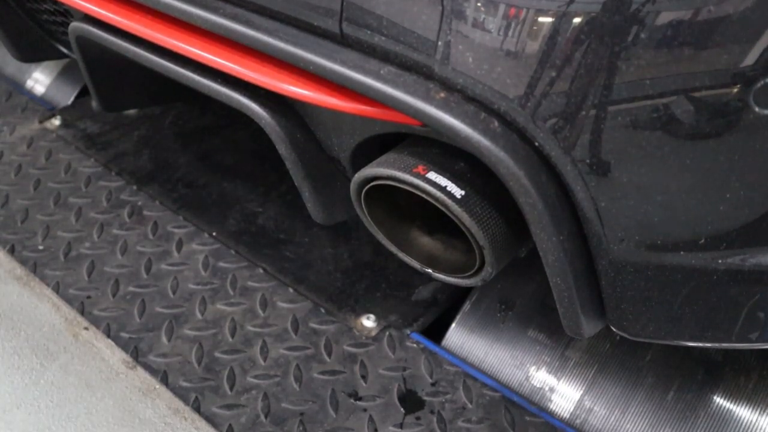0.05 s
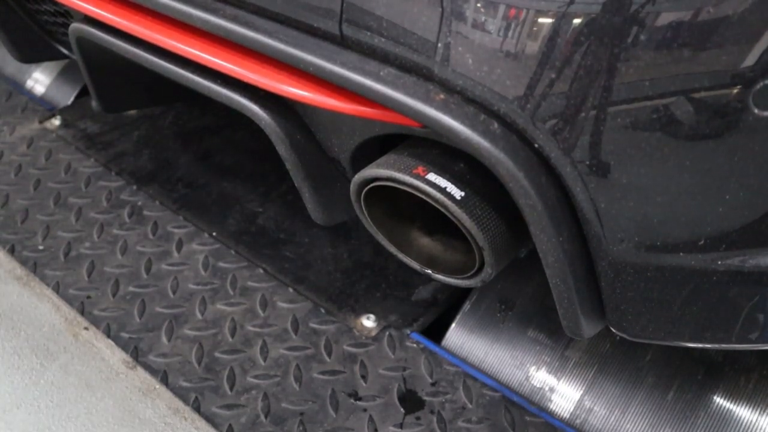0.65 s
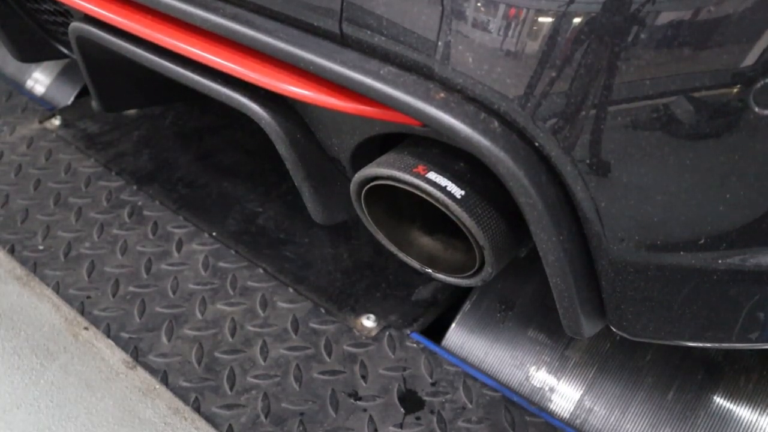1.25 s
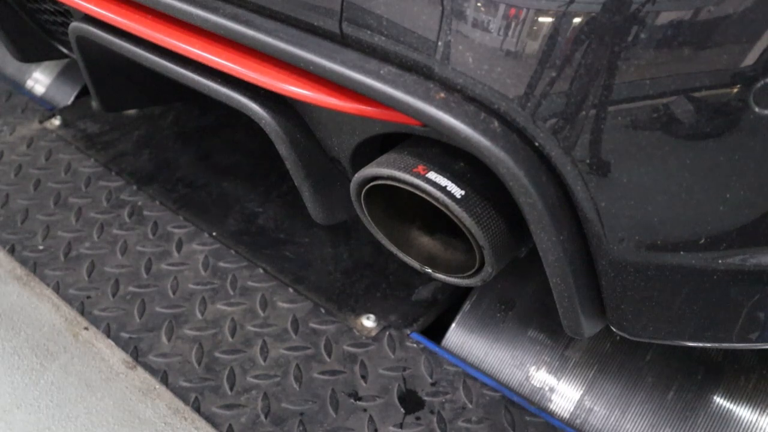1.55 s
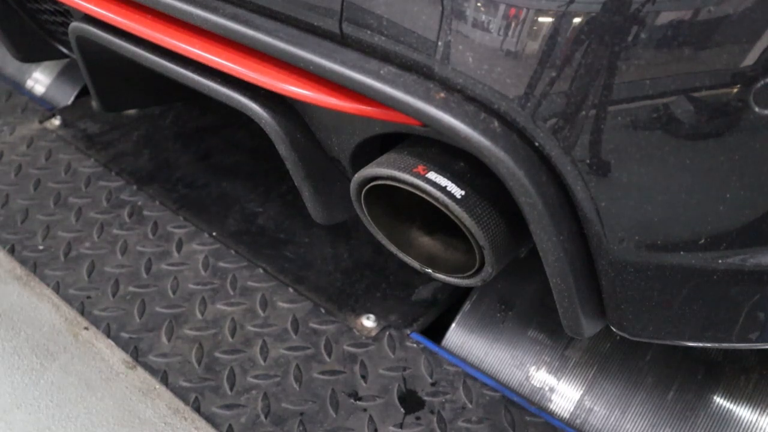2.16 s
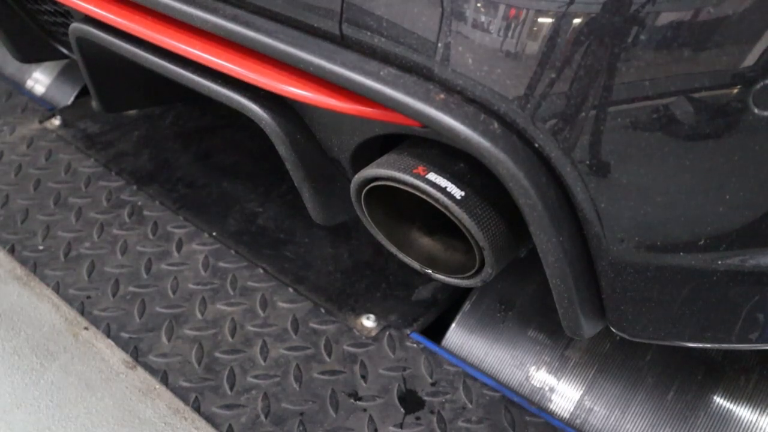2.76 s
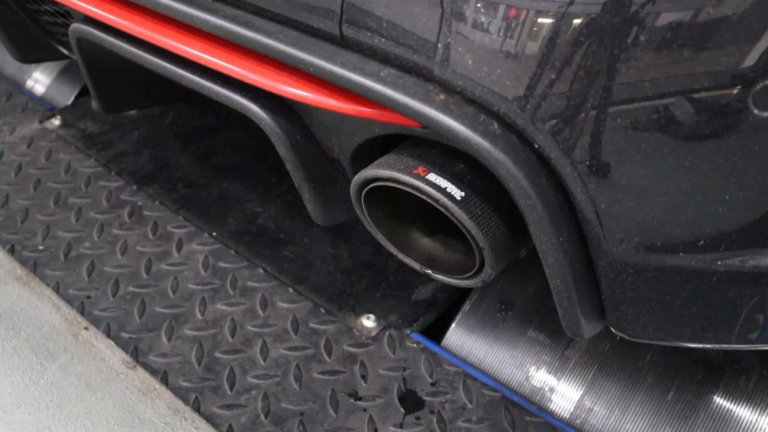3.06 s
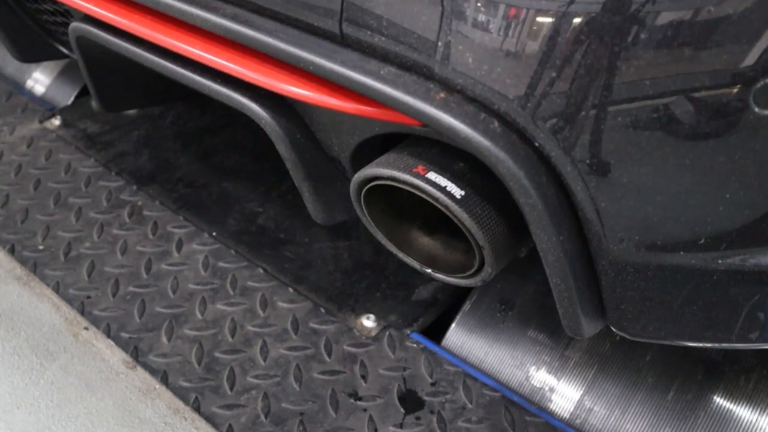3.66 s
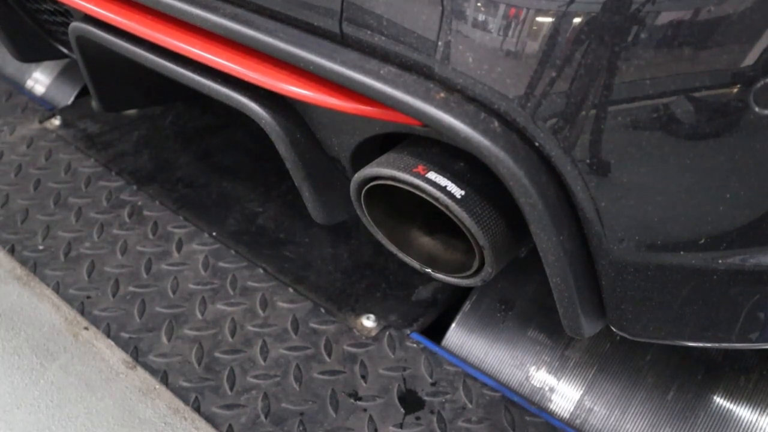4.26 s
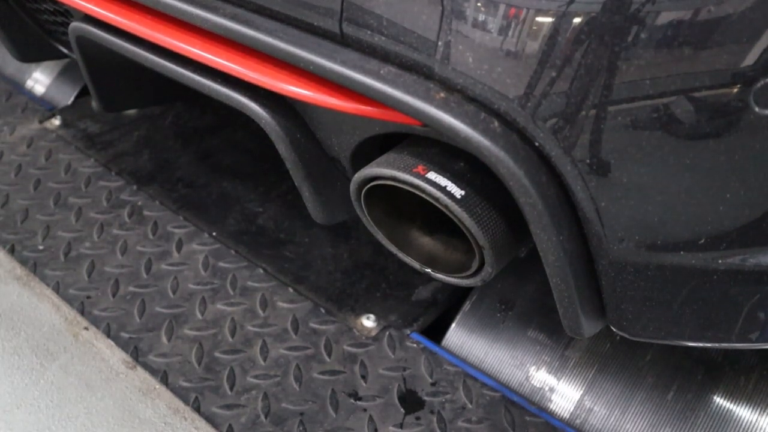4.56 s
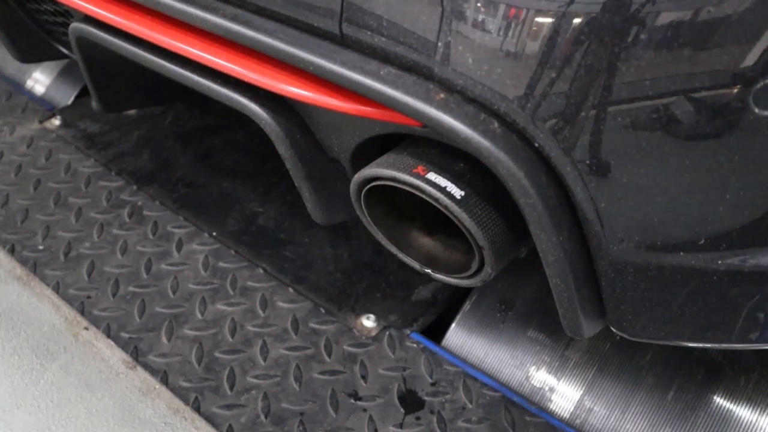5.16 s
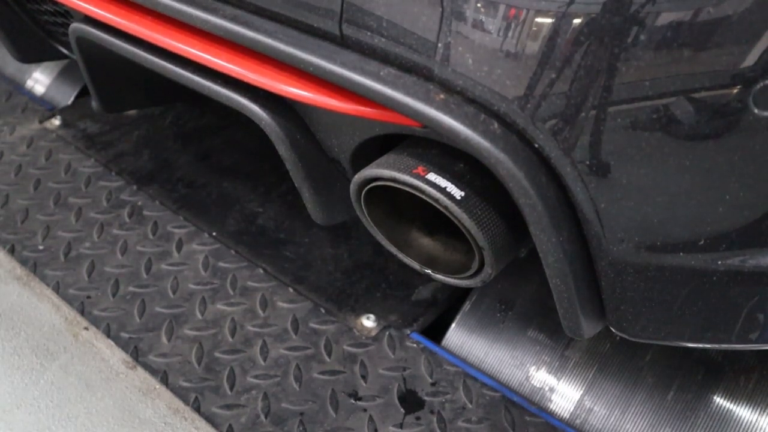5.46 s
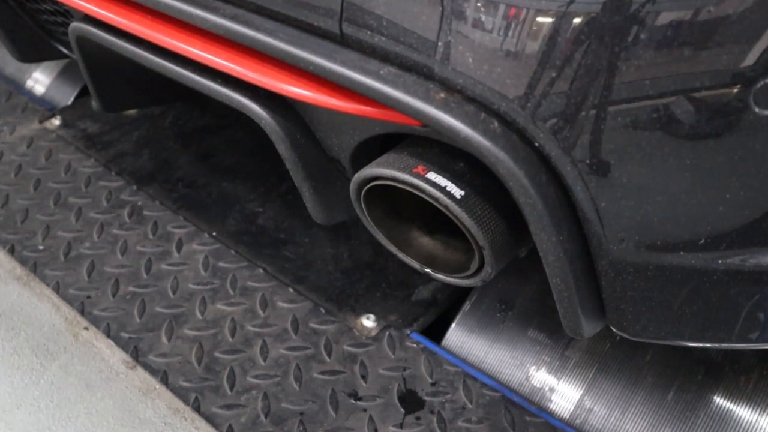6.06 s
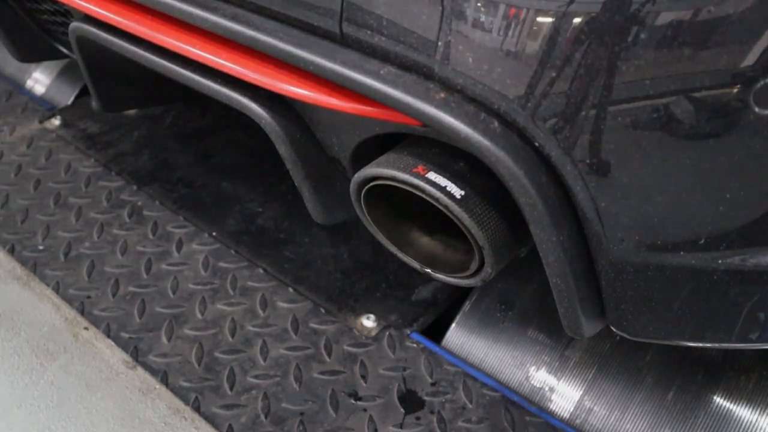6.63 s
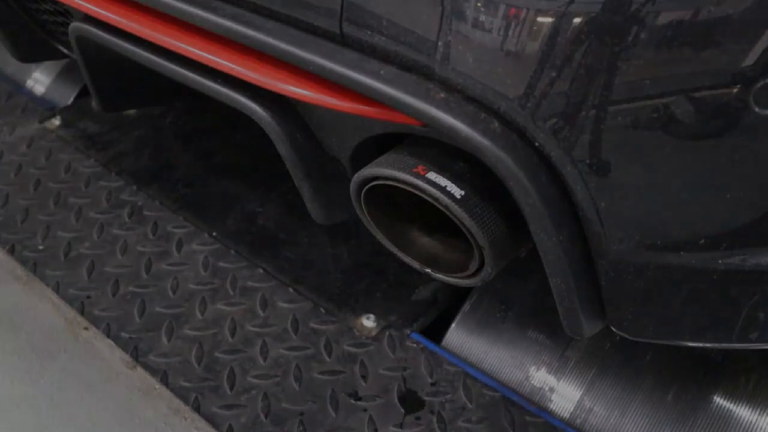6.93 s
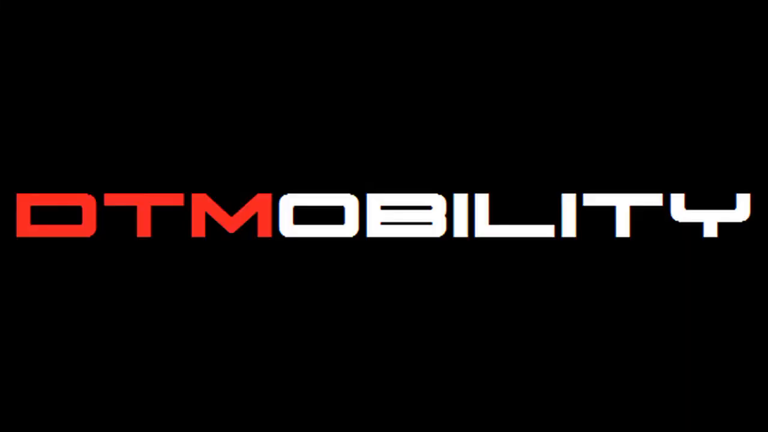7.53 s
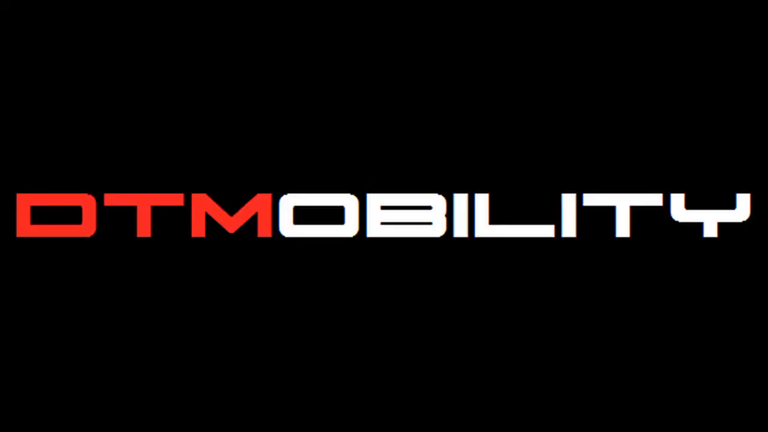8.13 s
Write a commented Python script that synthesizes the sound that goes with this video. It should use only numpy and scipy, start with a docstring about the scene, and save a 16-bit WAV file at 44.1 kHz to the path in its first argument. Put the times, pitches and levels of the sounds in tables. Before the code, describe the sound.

Three raspy revs from a car's tailpipe over a low drone, each falling away with crackling pops in a hard-walled bay.

```python
"""A four-cylinder car drones, rasps and pops through three revs, beside its sports tailpipe in a test bay.
On throttle each firing kicks the pipe's modes, blows a turbulent puff and sets the tip snarling.
On lift-off fuel burns in the pipe, which burbles, pops and once bangs. The gas jet hisses; hard walls
answer. At the end the afterfire stops and the engine sinks smoothly towards idle."""
import sys
import numpy as np
from scipy import signal
from scipy.fft import rfft, irfft, next_fast_len
from scipy.io import wavfile
from scipy.ndimage import uniform_filter1d

SR = 44100
rng = np.random.default_rng(int(sys.argv[2]) if len(sys.argv) > 2 else 0)


def transcribe(signal):
    """Save signal, clipped to [-1, 1], as a 16-bit WAV file at the path in sys.argv[1]."""
    frames = np.atleast_2d(signal).T
    limited = np.clip(frames, -1, 1)
    pcm = np.round(limited * 32767).astype(np.int16)
    wavfile.write(sys.argv[1], SR, pcm)


N = 369999
TIME = np.arange(N) / SR
REF_HZ = 100  # reference firing rate
FIRST_LOAD = 0.45  # share of load that comes with the pedal; the rest builds late
EVEN_SCATTER_DB = 4.5  # between firings, without afterfire

# long modes of pipe and silencer: f/Hz, width/Hz, level/dB
LONG_MODES = [(54.4, 4.3, 2.5), (129.3, 5.6, 0), (173, 16.6, 4.5), (204.7, 10.6, 4.5), (262.1, 10.3, -4.5),
              (370.8, 14.8, -5.5), (452, 54, -5.5), (510.4, 28, -8)]
# bright modes of the tip: f/Hz, width/Hz, level/dB
TIP_MODES = [(433, 110, 0.5), (820, 210, 9.5), (1000, 36, 3.5), (1191, 73, -1.5), (1402, 38, 3),
             (1702, 56, 8), (1830, 55, 3.5), (2392, 43, -5), (2756, 70, -2), (2950, 72, -5),
             (3440, 110, -6), (3880, 93, -10), (5710, 600, -10.5)]
# spectrum of turbulent puffs: f/Hz, level/dB
PUFF_SPECTRUM = [(330, -5), (470, 5), (600, -27.5), (850, 6), (1200, 5), (1560, -2.5), (1780, 3.5),
                 (1950, 0), (2300, -7), (2900, -8.5), (3900, -18), (5900, -23), (8000, -26.5),
                 (13000, -37.5)]


def engine(start_hz=45.69, final_hz=53.9, spin_power=1.2, boost_power=2.75):
    """Firing rate and load: the pedal spins the engine up, the speed hangs, then friction slows it."""
    # throttle blips: t/s, spin-up/s, held/s, pedal travel/s, release/s, hang/s, start f/Hz, top f/Hz
    revs = [(.3, .465, .56, .13, .05, .1, 52, 151), (2.605, .713, .713, .03, .016, .08, 44, 204),
            (5.12, .46, .47, .22, .06, .26, 89, 176)]
    # pedal depth per blip: load factor
    depths = [0.87, 1.31, 0.96]
    points, load = [(0, start_hz)], np.zeros(N)
    ramp = np.linspace(0, 1, 20)
    ends = [(rev[0], rev[-2]) for rev in revs[1:]] + [(TIME[-1], final_hz)]
    for rev, (end_s, end_hz), depth in zip(revs, ends, depths):
        s, climb_s, held_s, travel_s, release_s, hang_s, low_hz, top_hz = rev
        points += zip(s + climb_s * ramp, low_hz + (top_hz - low_hz) * ramp ** spin_power)
        coast_s = s + held_s + hang_s
        points += [(coast_s, top_hz), (end_s, end_hz)]
        age_s = TIME - s
        pedal = np.clip(age_s / travel_s, 0, 1) * np.exp(-np.maximum(age_s - held_s, 0) / release_s)
        boost = np.clip(age_s / climb_s, 0, 1) ** boost_power
        load += depth * pedal * (FIRST_LOAD + (1 - FIRST_LOAD) * boost)
    return np.interp(TIME, *np.transpose(points)), load


def drone(state, phase, scatter_db, bloom_hz=240, whump_hz=170, whump_octaves=0.51):
    """Smooth part of the firing pulses; orders bloom and whump while among the pipe's long modes."""
    # drone law: base/dB, speed/dB per octave, load/dB, afterfire/dB
    law = (0, -1.5, 5.5, -6)
    # response of the pipe's standing waves: f/Hz, level/dB
    pipe = [(45, -42), (54, -17.5), (62, -28), (80, -29.5), (90, -32.5), (101, -42.5), (115, -25),
            (128, -22), (140, -29.5), (153, -23.5), (176, -27), (195, -26), (212, -23), (240, -29.5),
            (268, -26.5), (300, -27), (360, -29.5)]
    hz, _, burn = state
    lumps_db = 7 * burn * np.minimum(hz / REF_HZ, 1) ** 2 * drift(17)  # afterfire breaks up the note
    drive_db = level_db(law, state) + lumps_db
    # uneven burning shakes timing and strength
    angle = 2 * np.pi * (phase + 0.039 * (scatter_db - EVEN_SCATTER_DB / 2) * drift(45))
    out, swells = 0, whumps()
    for k, order_db in enumerate([0, -2, -12, -16, -20], 1):
        bloom = 1 if k == 1 else 0.76 + 0.69 / (1 + (k * hz / bloom_hz) ** 8)
        pipe_db = curve_db(pipe, min(k, 2) * hz)
        tone = bloom * undb(drive_db + pipe_db + order_db + 0.88 * scatter_db * drift(35))
        whump = swells * np.exp(-(np.log2(k * hz / whump_hz) / whump_octaves) ** 2)
        out += np.hypot(tone, whump) * np.sin(k * angle)
    return np.sqrt(2) * out


def whumps():
    """Envelope of the swells that hard firings add to the low note."""
    # runs of hard firings: t/s, length/s, level/dB
    runs = [(0.46, 0.12, -18), (0.792, 0.15, -9), (1.089, 0.081, -10.5), (1.274, 0.11, -15),
            (1.43, 0.054, -22), (2.16, 0.1, -22.5), (2.752, 0.32, -14.5), (3.128, 0.044, -13),
            (3.334, 0.047, -8.5), (3.455, 0.024, -4.5), (3.485, .048, -10), (3.54, 0.041, -14),
            (3.617, 0.12, -11.5), (3.848, 0.042, -17.5), (3.92, 0.078, -15), (4.127, 0.04, -22),
            (4.36, 0.29, -16), (4.746, 0.08, -26), (4.89, 0.05, -31), (5.699, 0.076, -9.5),
            (6.228, 0.04, -20), (6.543, 0.25, -18.5), (6.725, 0.2, -13.5), (6.995, 0.12, -21.5),
            (7.18, 0.11, -14), (7.366, 0.046, -18), (7.49, 0.036, -19)]
    out = np.zeros(N)
    for s, length_s, db in runs:
        add(out, s, undb(db) * np.hanning(int(length_s * SR)) ** 0.5)
    return out


def firings(state, phase, scatter_db, jitter_s_per_db=0.000201, sputter_db=2.5, gas_share=0.065):
    """Each firing kicks the pipe and blows a puff of gas; afterfire makes them sputter in clumps."""
    # cylinders in firing order: level/dB
    cylinder_db = [0, -2.5, -0.4, -0.14]
    # bark and rasp laws: base/dB, speed/dB per octave, load/dB, afterfire/dB
    bark_law = (-35, 6.5, 11.5, 5.5)
    rasp_law = (-38, 7, 15, 0.5)
    _, _, burn = state
    even_s = np.interp(np.arange(int(phase[-1]) + 1), phase, TIME)
    size_draw, time_draw = rng.standard_normal((len(even_s), 2)).T
    spread_db = np.interp(even_s, TIME, scatter_db)
    cylinders = undb(np.resize(cylinder_db, len(even_s)))
    sizes = cylinders * undb(spread_db * np.tanh(size_draw))
    uneven_s = even_s + jitter_s_per_db * (spread_db - 0.75 * EVEN_SCATTER_DB) * time_draw
    clumps_db = sputter_db * burn * drift(28)
    lumps = pulses(uneven_s, sizes - uniform_filter1d(sizes, size=9))  # departure from an even train
    strengths = sizes ** 0.48
    puffs = strengths[phase.astype(int)] * np.exp(-(phase % 1)) * rng.standard_normal(N)
    kicks = pulses(uneven_s, strengths) + gas_share * puffs
    bark = undb(level_db(bark_law, state) + clumps_db) * steady(ring(kicks, tailpipe(rise_s=0.0013)))
    rasp = undb(level_db(rasp_law, state) + clumps_db / 2) * steady(ring(puffs, colour(PUFF_SPECTRUM)))
    out = undb(clumps_db) * burble(lumps, state) + bark + rasp
    return out + snarl(pulses(even_s, cylinders), puffs, state)


def tailpipe(rise_s, low_hz=620):
    """Impulse response of the tailpipe, hollow below its first mode."""
    # short modes of the tailpipe: f/Hz, width/Hz, level/dB
    short_modes = [(664, 14, -3), (702, 22, 7), (745, 42, 4), (805, 42, 2), (872, 30, 0), (1060, 200, -12),
                   (1150, 26, -11), (1223, 20, -12), (1290, 19, -6)]
    return signal.sosfilt(highpass(4, low_hz), modes(short_modes, top_hz=1420, rise_s=rise_s))


def snarl(train, puffs, state, roughness=0.33):
    """Even firings steepen into shocks that ring the tip on throttle; speed and afterfire roughen them."""
    # snarl law: base/dB, speed/dB per octave, load/dB, afterfire/dB
    law = (-37, 6.5, 11, -8.5)
    hz, load, burn = state
    fronts = steady(train) + (roughness * hz / REF_HZ + burn) * steady(puffs)
    throttle = np.clip(0.078 + load / FIRST_LOAD, 0, 1)
    # hot gas raises all modes: ring them on a faster clock
    clock = np.cumsum(1 + 0.029 * np.log2(hz / REF_HZ) + 0.03 * load)
    ticks = np.arange(int(clock[-1]) + 1)
    tip = ring(np.interp(ticks, clock, fronts), modes(TIP_MODES, top_hz=6800, rise_s=0.0026))
    return undb(level_db(law, state)) * throttle * steady(np.interp(clock, ticks, tip))


def afterfire(fade_s=0.19):
    """Strength of fuel burning in the pipe: 0 for none, about 1 in a spell."""
    # spells of burning: t/s, length/s, strength
    spells = [(-.1, .48, .9), (.97, 1.58, .95), (3.36, 1.7, 1.0), (5.7, .22, .9), (6.14, 1.42, 1.05)]
    burn = sum(strength * ((TIME >= s) & (TIME < s + length_s)) for s, length_s, strength in spells)
    return uniform_filter1d(burn, int(fade_s * SR))


def burble(lumps, state, deep_db=5):
    """Uneven firings ring the long modes; the deepest answers only to afterfire, best at low speed."""
    # burble law: base/dB, speed/dB per octave, load/dB, afterfire/dB
    law = (-33, -1, 10.5, 8)
    hz, _, burn = state
    deep = ring(lumps * burn, modes(LONG_MODES[:1], top_hz=300, rise_s=0.04))
    deep *= undb(deep_db) * np.minimum(REF_HZ / hz, 1) ** 3
    upper = ring(lumps, modes(LONG_MODES[1:], top_hz=587, rise_s=0.0075))
    return undb(level_db(law, state)) * steady(deep + upper)


def pops():
    """Fuel pockets ignite in the pipe: a thump, a short bark and a crack that rings the tip."""
    # ignitions: t/s, relative body level/dB, relative crack level/dB
    ignitions = [(0.208, -15.5, -42), (0.952, -11.5, -47), (1.096, -15, -34), (1.151, -11, -28),
                 (1.27, -15, -33.5), (1.363, -23, -38), (1.46, -12, -29.5), (1.56, -27, -56),
                 (1.666, -16.5, -32), (1.856, -24, -76), (1.963, -17, -52), (2.054, -19.5, -59),
                 (2.173, -22.5, -61), (2.403, -26, -63), (3.375, -12, -16.5), (3.412, -18, -35),
                 (3.447, -12, -24.5), (3.563, -11, -22.5), (3.612, -11, -25.5), (3.638, -10, -22.5),
                 (3.649, -12, -22), (3.732, -9.5, -21), (3.824, -25, -47), (3.861, -15.5, -33),
                 (3.941, -20.5, -32), (4.114, -18, -41), (4.15, -17, -37), (4.489, -16.5, -38),
                 (4.607, -20.5, -46), (4.817, -20.5, -38), (5.004, -15, -38), (5.581, -13, -37),
                 (5.733, -10.5, -26), (5.855, -10.5, -27), (5.868, -21, -37), (5.882, -16, -33),
                 (6.174, -19.5, -34.5), (6.28, -24, -36.5), (6.383, -22, -39), (6.474, -19.5, -39),
                 (6.601, -18, -35), (6.666, -26, -36), (6.833, -22, -31.5), (7.008, -17.5, -53),
                 (7.117, -16, -52), (7.173, -18, -62), (7.238, -18.5, -48.5), (7.306, -16, -53),
                 (7.508, -16, -44)]
    thump = modes(LONG_MODES, top_hz=510, rise_s=0.0056)
    bark, crack = tailpipe(rise_s=0.00064), colour(PUFF_SPECTRUM)
    tip = modes(TIP_MODES, top_hz=5500, rise_s=0.0005)
    out = np.zeros(N)
    for s, body_db, crack_db in ignitions:
        add(out, s, undb(body_db - 8) * burst(thump, decay_s=0.021, grit=0.019))
        add(out, s, undb(body_db - 7.5) * burst(bark, decay_s=0.01, grit=0.05))
        add(out, s, undb(crack_db + 2.5) * burst(crack, decay_s=0.01, grit=0.22))
        add(out, s, undb(crack_db - 4) * burst(tip, decay_s=0.019, grit=0.24))
    return out


def bangs(gain_db=-15):
    """Detonations at the pipe mouth: shock fronts with treble right to the top."""
    # detonations: t/s, relative level/dB
    detonations = [(3.382, -15), (5.781, 1.5), (5.788, -6)]
    shock = colour([(300, 11.5), (2000, 5), (3300, -3), (4500, -8), (13000, -8)])
    out = np.zeros(N)
    for s, db in detonations:
        add(out, s, undb(db + gain_db) * burst(shock, decay_s=0.0017, grit=0.58))
    return out


def jet(state):
    """Hiss of the gas stream, with rushes of air that swell and fade around each lift-off."""
    # jet spectrum: f/Hz, level/dB
    spectrum = [(1500, 1.5), (2800, -0.5), (5500, -6.5), (8500, -10.5), (11500, -9.5), (13000, -34.5)]
    # hiss law: base/dB, speed/dB per octave, load/dB, afterfire/dB
    law = (-51.5, 11.5, 0.5, -2.6)
    # air rushes: t/s, relative level/dB, decay/s, centre f/Hz
    rushes = [(0.69, -27, 0.061, 5700), (0.76, -30.5, 0.13, 10800), (5.42, -24, 0.064, 5750),
              (3.018, -21.5, 0.057, 5770), (3.14, -24, 0.096, 10600), (5.478, -27, 0.18, 10800),
              (5.824, -14, 0.018, 6400), (5.828, -17.5, 0.099, 1670)]
    out = undb(level_db(law, state)) * steady(ring(rng.standard_normal(N), colour(spectrum)))
    for s, db, decay_s, hz in rushes:
        band = colour([(hz / 4, -12), (hz, 0), (hz * 1.67, -13), (hz * 4, -30)])
        air = ring(rng.standard_normal(SR), band)
        fade = np.exp(-TIME[:SR] / decay_s)
        add(out, s, undb(db) * air / air.std() * fade * (1 - fade) ** 2)
    return out


def bay(x, wet_db, near_db, t60_s=0.7, near_t60_s=0.065, quadrature_hz=3840, size=22000):
    """Stereo: treble drifts out of phase, floor and bumper widen the sound, hard walls answer it."""
    f = np.fft.rfftfreq(next_fast_len(N + size), 1 / SR)
    allpass = np.exp(-2j * np.arctan(f / quadrature_hz))
    right = irfft(rfft(x, 2 * len(f) - 2) * allpass)[:N]
    t = TIME[:size]
    walls = colour([(230, -6), (700, -2), (1400, 3), (3000, 1), (12000, -11)])
    decays = undb(-60 * t / np.array([[t60_s], [t60_s], [near_t60_s]]))
    tails = rng.standard_normal((3, size)) * decays * (t > 0.002)
    tails /= np.sqrt(np.sum(tails ** 2, axis=1, keepdims=True))
    *far, near = [ring(x, ring(tail, walls)) for tail in tails]
    return np.array([x, right]) + undb(wet_db) * np.array(far) + undb(near_db) * np.array([near, -near])


def level_db(law, state):
    """Level of one voice from firing rate, load and afterfire."""
    base_db, speed_db, load_db, burn_db = law
    hz, load, burn = state
    return base_db + speed_db * np.log2(hz / REF_HZ) + load_db * load + burn_db * burn


def modes(table, top_hz, rise_s, size=9000):
    """Impulse response of resonances that build up along the pipe, rolled off above top_hz."""
    t = TIME[:size]
    rings = sum(undb(db) * width * np.exp(-np.pi * width * t) * np.cos(2 * np.pi * hz * t)
                for hz, width, db in table)
    lowpass = signal.butter(4, top_hz, fs=SR, output="sos")
    return signal.sosfilt(lowpass, rings * (1 - np.exp(-t / rise_s)) / SR)


def colour(points, size=2048):
    """Minimum-phase impulse response of a spectrum; bass falls away below the first point."""
    f = np.fft.rfftfreq(size, 1 / SR) + 1
    gain = undb(curve_db(points, f)) * np.minimum(f / points[0][0], 1) ** 2
    cepstrum = irfft(np.log(gain))
    cepstrum[1:size // 2] *= 2
    cepstrum[size // 2 + 1:] = 0
    return irfft(np.exp(rfft(cepstrum)))


def curve_db(points, hz):
    """Log-frequency interpolation of (f/Hz, level/dB) points."""
    points_hz, db = np.transpose(points)
    return np.interp(np.log(hz), np.log(points_hz), db)


def burst(response, decay_s, grit, size=5000):
    """Pressure kick with a turbulent tail, rung through a response; unit RMS over the first 20 ms."""
    drive = grit * rng.standard_normal(size) * np.exp(-TIME[:size] / decay_s)
    drive[0] += 1
    sound = signal.fftconvolve(drive, response)
    return sound / np.sqrt(np.mean(sound[:SR // 50] ** 2))


def pulses(times_s, sizes):
    """Clicks, each shared between two samples."""
    place = np.clip(times_s * SR, 0, N - 2)
    i = place.astype(int)
    return np.bincount(i, sizes * (1 - place + i), N) + np.bincount(i + 1, sizes * (place - i), N)


def steady(x, size=6000):
    """Unit long-run RMS, quick flutter kept."""
    power = uniform_filter1d(uniform_filter1d(x ** 2, size), size // 2)
    return x / np.sqrt(np.abs(power) + 1e-14)


def drift(rate_hz):
    """Random drift between -1 and 1."""
    return np.interp(TIME * rate_hz, np.arange(1000), rng.uniform(-1, 1, 1000))


def ring(x, response):
    """Drive through an impulse response."""
    return signal.oaconvolve(x, response)[:len(x)]


def highpass(order, hz):
    """High-pass filter sections."""
    return signal.butter(order, hz, "high", fs=SR, output="sos")


def add(out, s, sound):
    """Mix a sound in at time s."""
    i = int(s * SR)
    out[i:i + len(sound)] += sound[:N - i]


def undb(db):
    """Decibels to gain."""
    return 10 ** (np.asarray(db) / 20)


def scene():
    """Engine speed times every firing; all leaves the tailpipe into the bay, the hiss spreading widest."""
    hz, load = engine()
    burn = afterfire()
    state = hz, load, burn
    phase = np.cumsum(hz) / SR  # one cycle per firing
    scatter_db = EVEN_SCATTER_DB + 3.5 * burn * np.minimum(hz / REF_HZ, 1) ** 3  # steadier near idle
    exhaust = drone(state, phase, scatter_db) + firings(state, phase, scatter_db) + pops()
    return (bay(exhaust, wet_db=-7, near_db=-9.5)
            + bay(jet(state), wet_db=3, near_db=7)
            + bay(bangs(), wet_db=-3.5, near_db=-10))


def record(dry, mono_below_hz=340, low_hz=30, top_hz=13200):
    """Merge the bass to mono, shed the deepest of it, clip at full scale and cut the top."""
    mid, side = (dry[0] + dry[1]) / 2, (dry[0] - dry[1]) / 2
    side = signal.sosfiltfilt(highpass(1, mono_below_hz), side)
    lean = signal.sosfilt(highpass(2, low_hz), [mid + side, mid - side])
    return signal.sosfilt(signal.ellip(8, 0.2, 85, top_hz, fs=SR, output="sos"), np.clip(lean, -1, 1))


dry = scene()
out = record(dry)
transcribe(out)
```